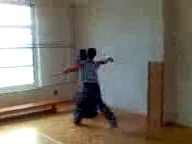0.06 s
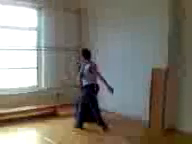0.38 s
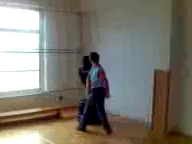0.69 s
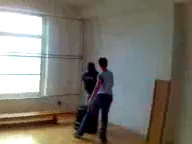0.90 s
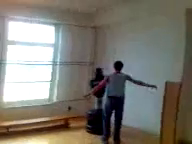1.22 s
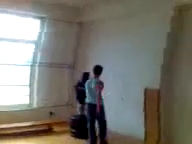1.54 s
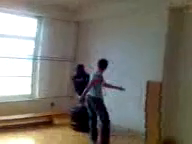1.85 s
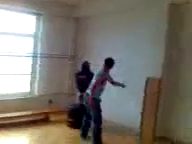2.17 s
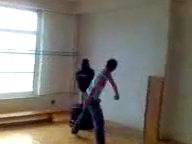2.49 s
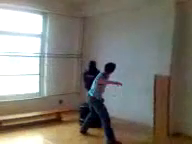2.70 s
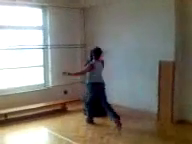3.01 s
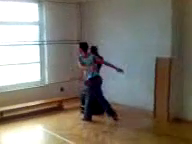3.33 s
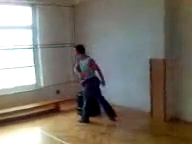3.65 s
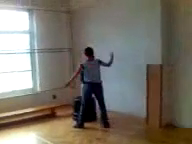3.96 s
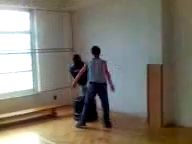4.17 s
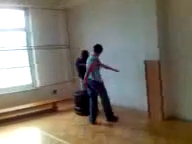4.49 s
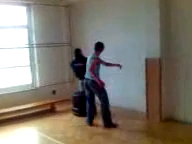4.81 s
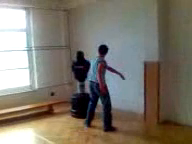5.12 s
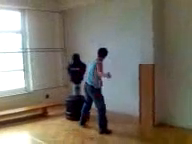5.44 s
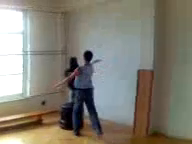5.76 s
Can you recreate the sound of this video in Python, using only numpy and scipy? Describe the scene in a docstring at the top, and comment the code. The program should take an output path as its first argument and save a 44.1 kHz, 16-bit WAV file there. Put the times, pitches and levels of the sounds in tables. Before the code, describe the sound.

Three punches on a rubber dummy echo through a bare hall, the first much the hardest, amid light footwork on wood.

```python
"""A large bare hall with a wooden floor: three hard punches land on a free-standing dummy.
Each is a smack of skin on rubber plus a thud of the padded body, followed by a long echo.
Between them shoes tap, scuff and squeak, the boards boom softly and small dry knocks sound close by.
A small narrow-band microphone picks it up, and the first punch overloads the recorder."""
import sys
import numpy as np
from scipy import signal
from scipy.fft import rfft, irfft, next_fast_len
from scipy.io import wavfile

SR = 44100
rng = np.random.default_rng(int(sys.argv[2]) if len(sys.argv) > 2 else 0)


def bounce(signal):
    """Save signal as a 16-bit WAV file at the path given by the first command-line argument."""
    frames = np.transpose(np.atleast_2d(signal))
    limited = np.clip(frames, -1, 1)
    pcm = np.round(limited * 32767).astype(np.int16)
    wavfile.write(sys.argv[1], SR, pcm)


N = 262836
TIME = np.arange(N) / SR


def from_db(db):
    """Decibels to gain."""
    return 10 ** (np.asarray(db) / 20)


def at_hz(points, hz):
    """Read a table along a log-frequency axis."""
    known_hz, values = np.transpose(points)
    return np.interp(np.log(np.maximum(hz, 1)), np.log(known_hz), values)


def unit_energy(x):
    """Scale a pulse so that its squares sum to one."""
    return x / np.sqrt(np.sum(x ** 2) + 1e-20)


def coloured(x, spectrum):
    """EQ by a curve of f/Hz, gain/dB."""
    size = next_fast_len(N + SR // 4)
    hz = np.arange(size // 2 + 1) * SR / size
    return irfft(rfft(x, size) * from_db(at_hz(spectrum, hz)), size)[:N]


def resonate(x, hz, width_hz):
    """One resonance with unity gain at its peak."""
    r = np.exp(-np.pi * width_hz / SR)
    feedback = [1, -2 * r * np.cos(2 * np.pi * hz / SR), r * r]
    return signal.lfilter(np.array([1, 0, -1]) * (1 - r * r) / 2, feedback, x + 1e-18)


def struck(modes):
    """One hit on modes of f/Hz, width/Hz, level/dB; neighbours swing in opposite polarity."""
    click = signal.unit_impulse(SR // 2)
    rings = [(-1) ** k * from_db(db) * resonate(click, hz, width)
             for k, (hz, width, db) in enumerate(modes)]
    return unit_energy(sum(rings))


def add(out, s, sound):
    """Mix a sound in from time s on."""
    start = max(round(s * SR), 0)
    out[start:start + len(sound)] += sound[:N - start]


# ring of the hollow padded body: f/Hz, width/Hz, level/dB
BODY_MODES = [(176, 40, -9.5), (255, 45, -0.5), (341, 75, 0.5), (519, 150, 0), (650, 140, 0.5),
              (1050, 510, -4)]
# low end, the whole dummy giving way on its base: f/Hz, width/Hz, level/dB
BASE_MODES = [(58, 55, -0.5), (142, 69, -0.5)]
# hand on dummy: t/s, thud level/dB, thud f/Hz, smack level/dB, smack f/Hz,
# first touch (lead/s, thud offset/dB, smack offset/dB), follow-through (lag/s, offset/dB)
PUNCH_CUES = [(0.4330, -13.5, 350.2, -4, 2270, .0043, -13.5, -7, .055, -18),
              (3.292, -32, 300, -27.5, 2050, .007, -1.5, -8, .053, -3.5),
              (4.0949, -37, 270, -37, 1900, .0088, -1, -6, .083, -4.5)]


def punches(focus_width_hz=380, thump_offset_db=-16.5):
    """The body thuds, the base gives, the skin smacks; each radiates differently, with its own echoes."""
    out, body = np.zeros(N), struck(BODY_MODES)
    thump = signal.fftconvolve(struck(BASE_MODES), hall_response(direct_db=5, corner_db=-2.5))
    for s, thud_db, *_ in PUNCH_CUES:   # only the full weight moves the base
        add(out, s, from_db(thud_db + thump_offset_db) * thump)
    for s, thud_db, thud_hz, smack_db, smack_hz in contacts(PUNCH_CUES):
        thud = unit_energy(resonate(body, thud_hz, focus_width_hz))   # the spot hit favours some modes
        thud_reverb = hall_response(direct_db=8, corner_db=2, corner_s=0.018)
        add(out, s, from_db(thud_db) * signal.fftconvolve(thud, thud_reverb))
        smack = struck([(smack_hz, 1400, 0)])   # one wide mode: a short snap
        smack_reverb = hall_response(direct_db=0, corner_db=2, lumpy_db=1.48)
        add(out, s, from_db(smack_db) * signal.fftconvolve(smack, smack_reverb))
    return out


def contacts(blows, follow_thud_db=-2):
    """A punch lands in three stages: first touch, full weight and follow-through."""
    for s, thud_db, thud_hz, smack_db, smack_hz, *stages in blows:
        lead_s, touch_thud_db, touch_smack_db, lag_s, follow_db = stages
        yield s - lead_s, thud_db + touch_thud_db, thud_hz, smack_db + touch_smack_db, smack_hz
        yield s, thud_db, thud_hz, smack_db, smack_hz
        yield s + lag_s, thud_db + follow_db + follow_thud_db, thud_hz, smack_db + follow_db, smack_hz


# shoes tapping the floor: t/s, level/dB, f/Hz
TAP_CUES = [(0.053, -49, 1900), (0.056, -58.5, 560), (0.107, -53.5, 2230), (2.019, -56.5, 1218),
            (2.292, -66, 308), (4.492, -51, 595), (4.622, -52, 1690), (5.222, -61, 2000),
            (5.585, -77.5, 1612)]
# shoes scuffing along it: t/s, level/dB, f/Hz
SCUFF_CUES = [(0.21, -57, 2070), (2.825, -64, 2000), (2.941, -61.5, 950), (3.160, -63, 1500),
              (5.078, -63.5, 2270), (5.451, -64, 1900), (5.875, -76, 1498)]


def steps(tap_decay_s=0.005, scuff_decay_s=0.015, relative_width=0.44, dry_db=32):
    """Each shoe contact is a burst of friction, short for a tap and longer for a scuff."""
    out, t = np.zeros(N), TIME[:SR // 4]
    for cues, decay_s in ((TAP_CUES, tap_decay_s), (SCUFF_CUES, scuff_decay_s)):
        for s, db, hz in cues:
            friction = rng.standard_normal(len(t)) * np.exp(-t / decay_s)
            add(out, s, from_db(db) * unit_energy(resonate(friction, hz, relative_width * hz)))
    straight = from_db(dry_db) * out   # the open path along the floor
    return straight + signal.fftconvolve(out, hall_response(direct_db=1.5, corner_db=-2))[:N]


# ring of the floorboards: f/Hz, width/Hz, level/dB
BOARD_MODES = [(154, 9.6, -7.5), (223.4, 4.8, -4.5), (273, 66, -16.5), (466, 420, -23)]
# weight coming down on the boards: t/s, level/dB, f/Hz
TREAD_CUES = [(2.627, -54, 165), (2.713, -49, 220), (2.757, -57, 233)]


def treads(carried_db=28, focus_width_hz=220):
    """The floor booms softly under shifting weight, through the hall and straight along the boards."""
    out, boards = np.zeros(N), struck(BOARD_MODES)
    for s, db, hz in TREAD_CUES:
        boom = unit_energy(resonate(boards, hz, focus_width_hz))   # each footfall favours some modes
        add(out, s, from_db(db) * signal.fftconvolve(boom, hall_response(direct_db=1.5, corner_db=-18)))
        add(out, s, from_db(db + carried_db) * boom)
    return out


# small dry knocks close to the microphone: t/s, level/dB, f/Hz
KNOCK_CUES = [(0.0535, -42, 2130), (1.231, -26, 840), (1.7856, -36.5, 2330), (5.217, -49, 2010),
              (5.389, -56, 644)]


def knocks(width_hz=190, decay_cycles=7):
    """Brief knocks, so near that their echo is lost; the lower ones ring longer."""
    out, t = np.zeros(N), TIME[:SR // 4]
    for s, db, hz in KNOCK_CUES:
        burst = resonate(rng.standard_normal(len(t)), hz, width_hz)
        add(out, s, from_db(db) * burst / np.std(burst) * np.exp(-t * hz / decay_cycles))
    return out


# soles twisting on the varnish as the body turns into a punch: t/s, length/s, level/dB, f/Hz
SQUEAK_CUES = [(0.23, .14, -56, 2470), (0.345, .08, -48, 2470), (2.81, .14, -61, 2470),
               (3.0, .26, -68.5, 1770), (3.2, .06, -60.5, 2480)]


def squeaks(width_hz=80):
    """A turning sole gives a faint, narrow squeak that swells and fades with the twist."""
    out, t = np.zeros(N), TIME[:SR // 2]
    for s, length, db, hz in SQUEAK_CUES:
        squeak = resonate(rng.standard_normal(len(t)), hz, width_hz)
        twist = np.sin(np.pi * np.minimum(t / length, 1))
        add(out, s, from_db(db) * twist * squeak / np.std(squeak))
    return signal.fftconvolve(out, unit_energy(hall_response(direct_db=15, corner_db=6.5)))[:N]


# direct sound and early wall reflections: delay/s, level/dB
EARLY_ECHOES = [(0.0003, 16), (0.0065, 11), (0.0184, 21.5), (0.027, 10), (0.035, 16.5), (0.062, 12),
                (0.105, 7.5)]
# reverb time of the hall: f/Hz, t60/s
HALL_DECAY = [(60, 1.4), (160, 1.7), (400, 1.5), (1000, 1.84), (2100, 1.79), (3000, 1.52), (4200, 1.7)]


def hall_response(direct_db, corner_db, corner_s=0.017, lumpy_db=3, lump_s=0.018):
    """The hall's reverb: a few clear echoes, then ever denser reflections that die band by band."""
    size = 2 ** 17
    t, hz = np.arange(size) / SR, np.arange(size // 2 + 1) * SR / size
    reflections_per_s = 1500 * (1 + (t / 0.046) ** 2)
    density = np.clip(reflections_per_s / SR, 1e-3, 1)
    reflections = rfft(rng.standard_normal(size) * (rng.random(size) < density) / np.sqrt(density))
    centres, t60s = np.transpose(HALL_DECAY)
    response = np.zeros(size)
    for share, t60 in zip(np.eye(len(HALL_DECAY)), t60s):
        band = irfft(reflections * at_hz(np.c_[centres, share], hz))
        clusters = rng.standard_normal(size=512)   # reflections arrive in bunches
        swell_db = lumpy_db * np.interp(t / lump_s, np.arange(len(clusters)), clusters)
        response += band * from_db(swell_db) * np.exp(-np.log(1000) * t / t60)
    attack = 1 - np.exp(-t / 0.0016)
    # the nearby corner throws back extra sound before the hall has filled
    response *= attack * (1 + from_db(corner_db) * np.exp(-t / corner_s))
    for delay, db in EARLY_ECHOES:
        response[round(delay * SR)] += from_db(db + direct_db)
    return response


# colour of the steady room tone: f/Hz, level/dB
ROOM_TONE_EQ = [(30, -22.5), (110, -16), (200, -9.5), (330, 0), (600, -2), (1200, -4.5), (2200, -5),
                (3200, -10.5), (5000, -8.5)]


def room_tone(level_db=-61.5):
    """The even hush of the empty hall, its level set as heard through the microphone."""
    hush = coloured(rng.standard_normal(N), ROOM_TONE_EQ)
    return from_db(level_db) * hush / np.std(coloured(hush, MICROPHONE_EQ))


def scene():
    """Everything in the hall, mixed to mono."""
    return (punches() + steps() + treads() + knocks() + squeaks() + room_tone())[None]


# response of the small microphone: f/Hz, gain/dB
MICROPHONE_EQ = [(2600, 0), (3280, -0.5), (3550, -12), (4000, -21.5), (4350, -34), (4650, -62.5),
                 (5200, -100)]


def record(dry, ceiling=0.71, cutoff_hz=16000):
    """The microphone passes only lows and mids; overload flattens the peaks and adds a bright crackle."""
    clipped = np.clip(coloured(dry[0], MICROPHONE_EQ), -ceiling, ceiling)
    high_cut = signal.ellip(10, .1, 80, cutoff_hz, fs=SR, output="sos")
    return signal.sosfilt(high_cut, clipped)[None]


dry = scene()
out = record(dry)
bounce(out)
```